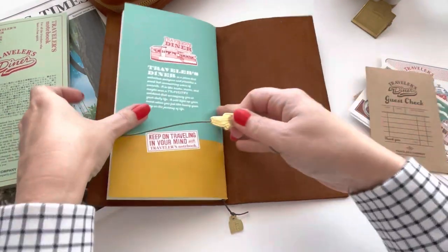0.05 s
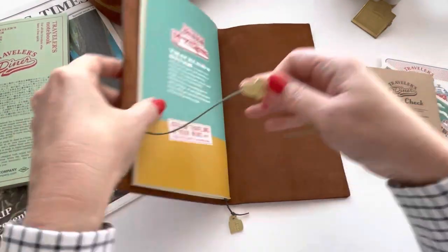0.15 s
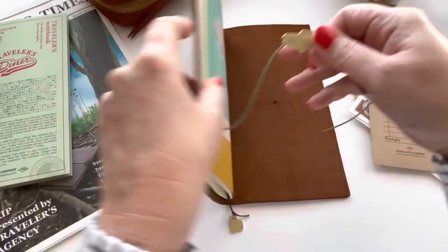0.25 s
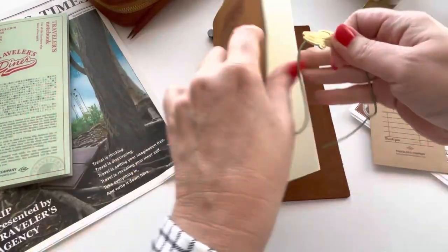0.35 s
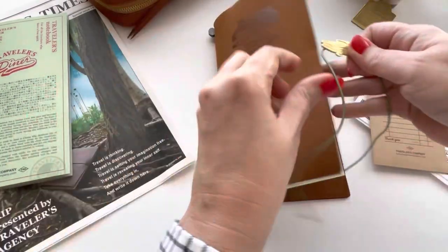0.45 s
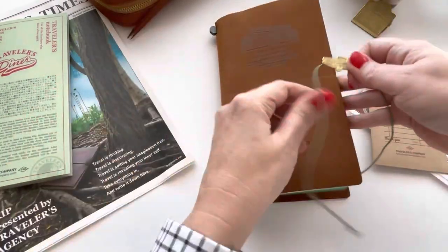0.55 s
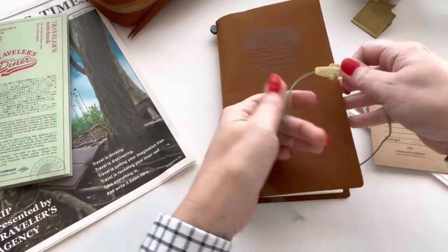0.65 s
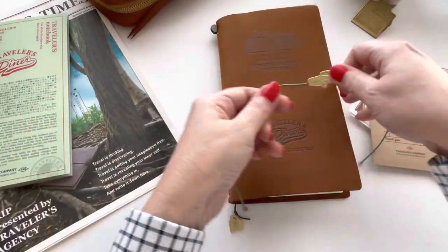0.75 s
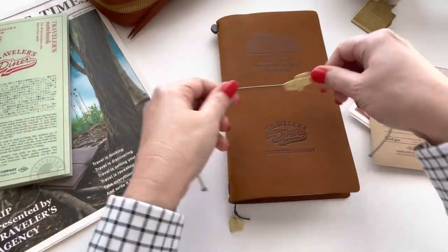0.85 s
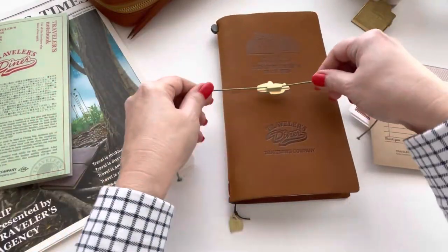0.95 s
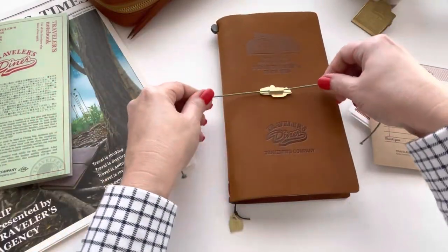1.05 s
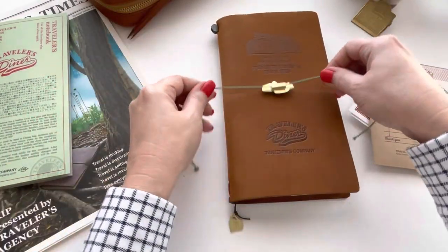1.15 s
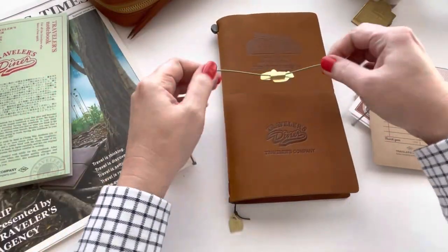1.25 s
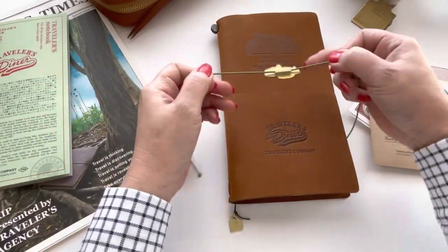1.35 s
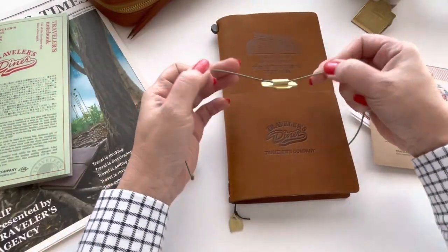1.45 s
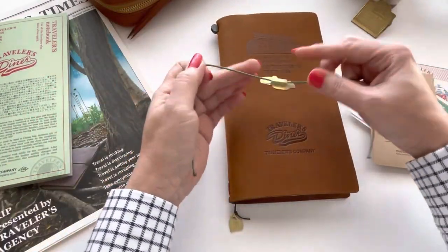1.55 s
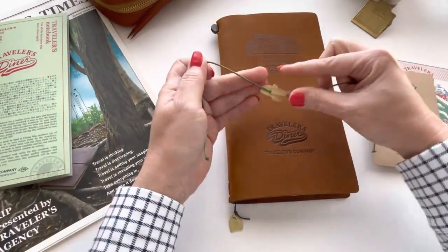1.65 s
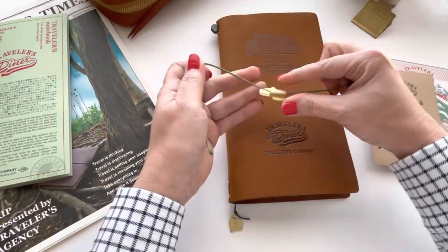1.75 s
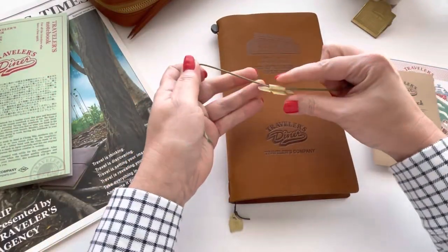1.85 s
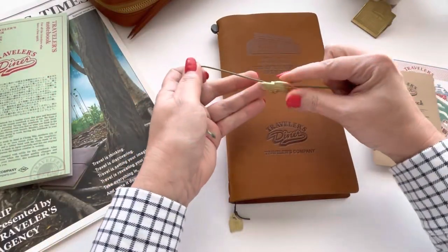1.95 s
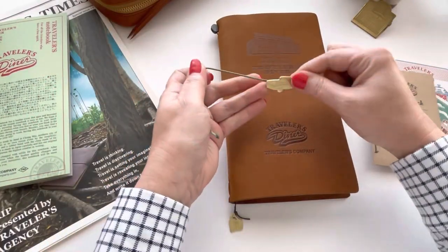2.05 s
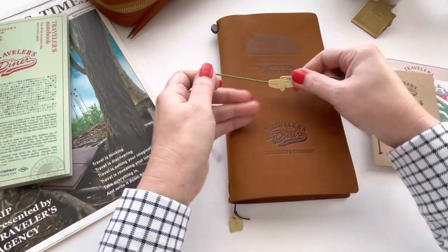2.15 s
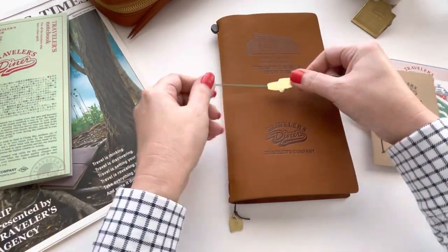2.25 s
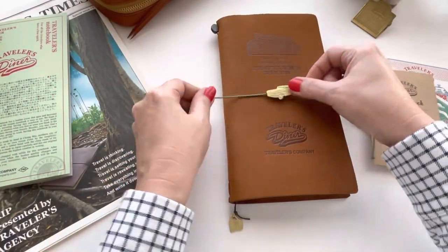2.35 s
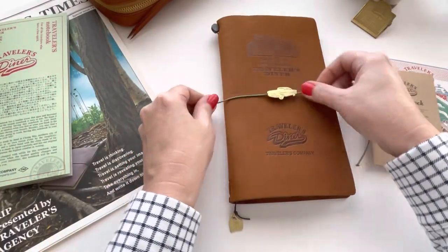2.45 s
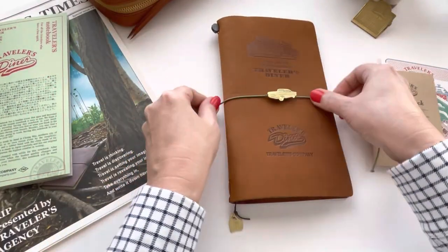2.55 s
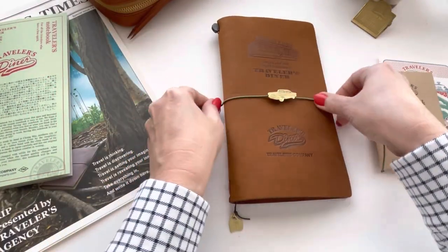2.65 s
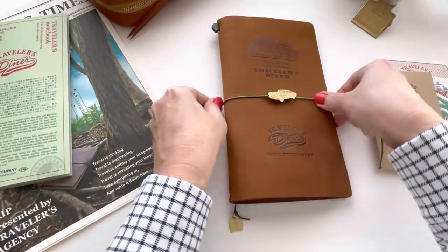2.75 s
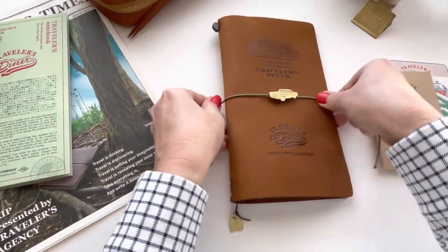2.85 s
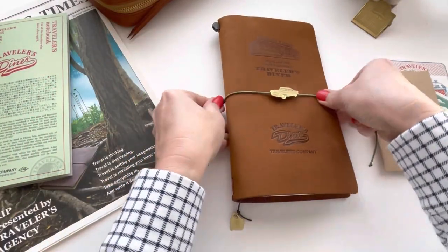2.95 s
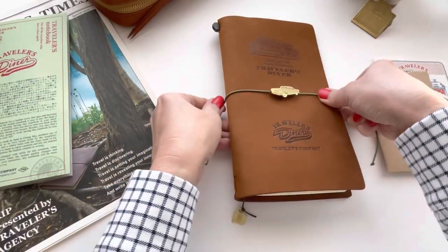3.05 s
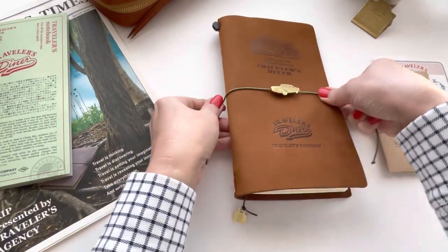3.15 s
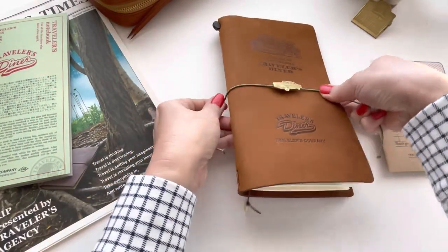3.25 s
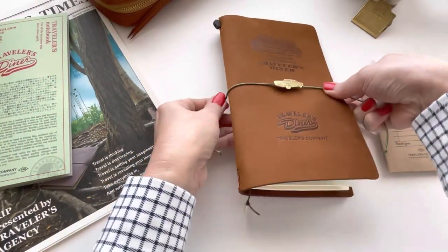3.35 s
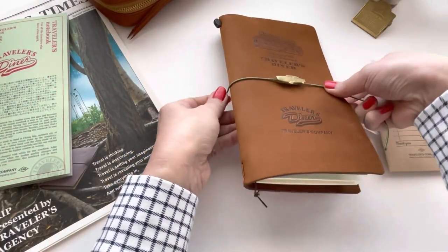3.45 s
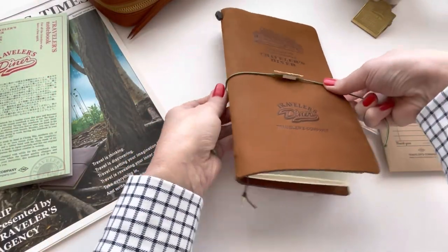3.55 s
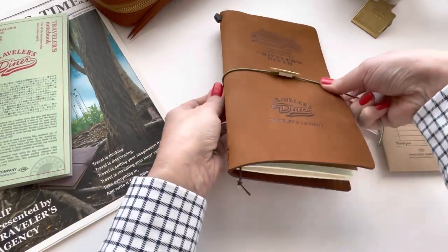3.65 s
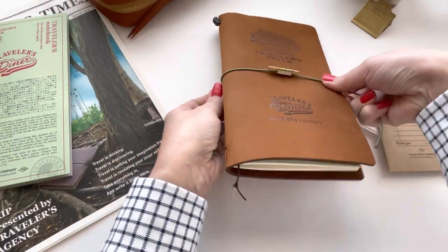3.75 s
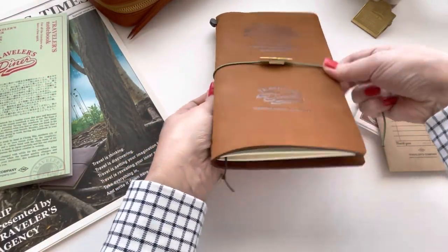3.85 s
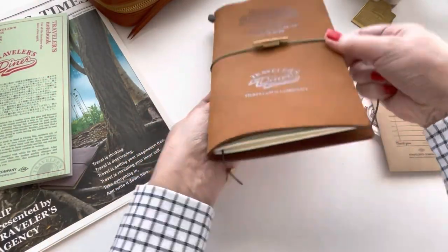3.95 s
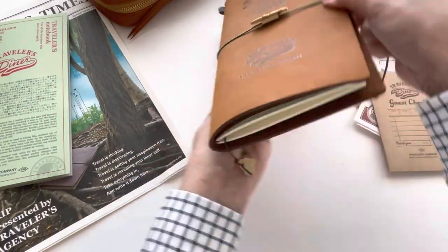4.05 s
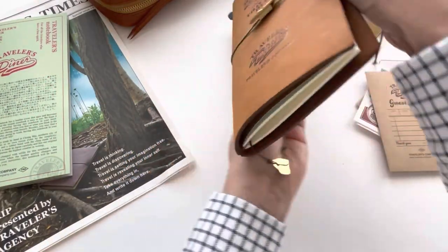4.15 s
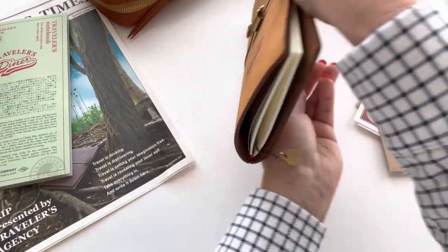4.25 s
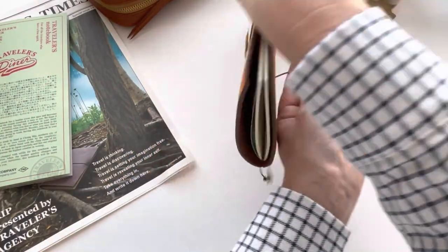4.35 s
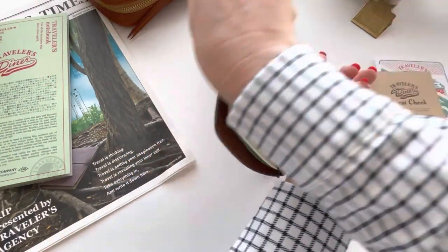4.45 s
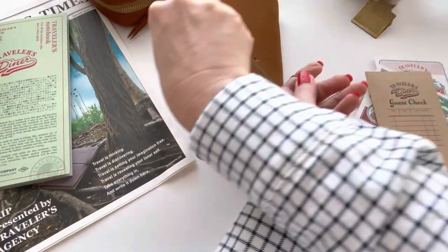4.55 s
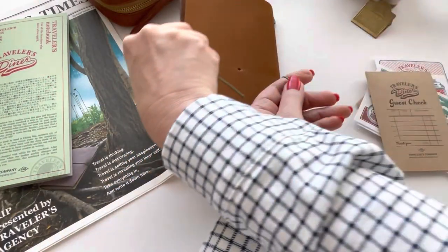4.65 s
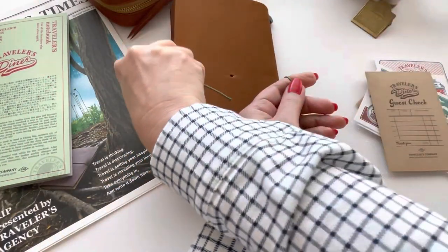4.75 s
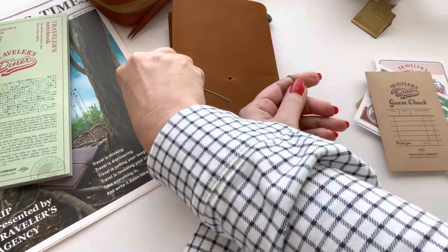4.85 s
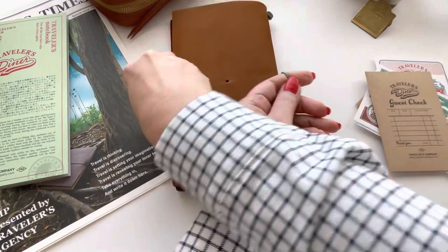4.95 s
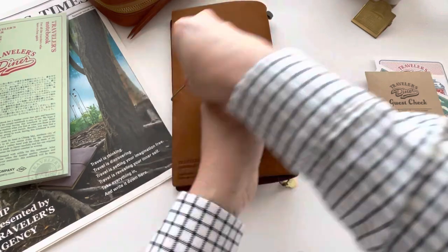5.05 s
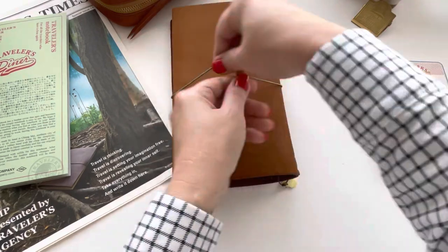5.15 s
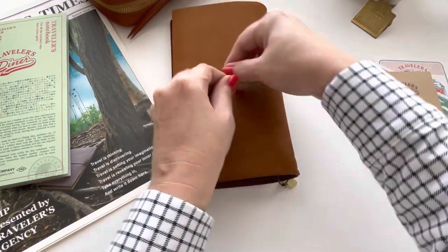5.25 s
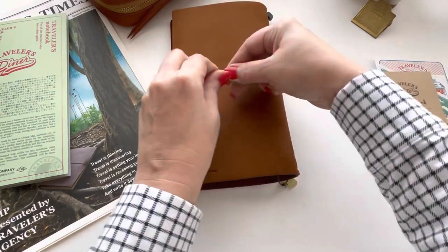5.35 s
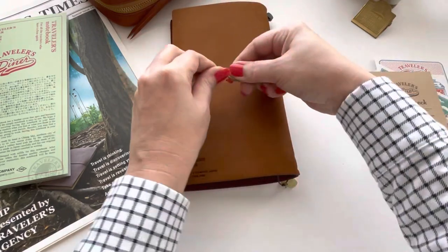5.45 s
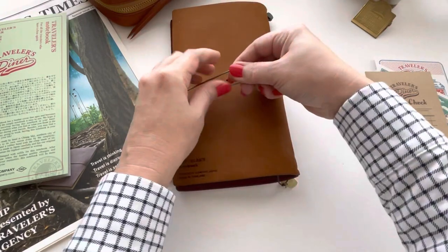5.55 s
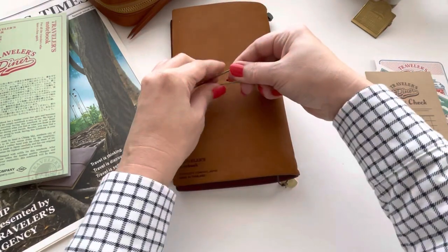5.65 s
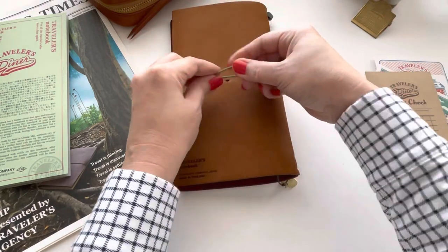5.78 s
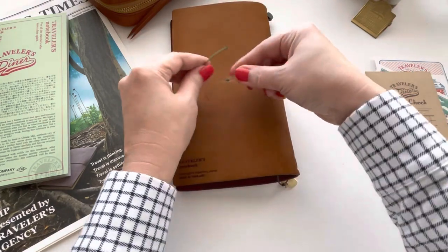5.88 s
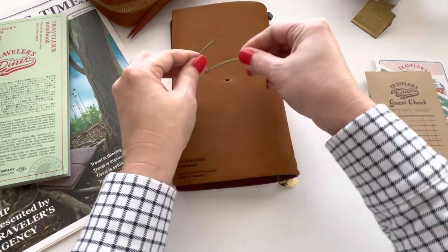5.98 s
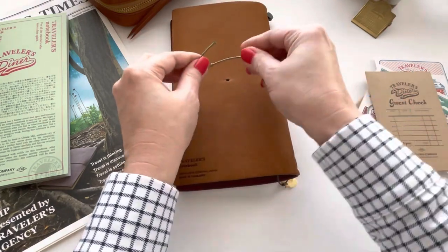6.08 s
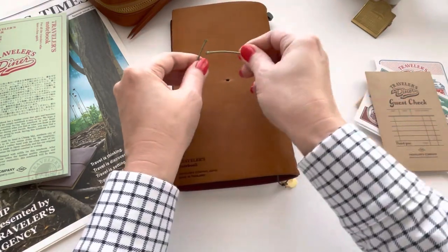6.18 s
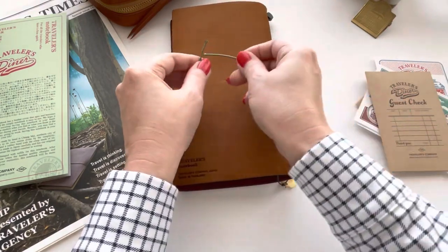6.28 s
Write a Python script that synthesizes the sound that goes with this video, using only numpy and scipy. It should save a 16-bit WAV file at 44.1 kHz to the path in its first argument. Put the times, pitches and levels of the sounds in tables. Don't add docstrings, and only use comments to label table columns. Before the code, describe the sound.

A close stereo microphone in a quiet room picks up hands closing a leather notebook, with scuffs, crisp ticks and a soft thud. Sparse taps and faint rubbing follow as a cord is adjusted. Later the book is turned over in a rapid cluster of loud knocks and clicks, then settles with a low thump. The end is almost silent, with only tiny skin and cord rubs, all slightly right of centre.

```python
import sys
import numpy as np
from scipy import signal
from scipy.fft import rfft, irfft, next_fast_len
from scipy.io import wavfile
from scipy.ndimage import uniform_filter1d, map_coordinates

SR = 44100
rng = np.random.default_rng(int(sys.argv[2]) if len(sys.argv) > 2 else 0)


def output_pcm(signal):
    pcm = np.clip(np.atleast_2d(signal).T, -1, 1) * 32767
    wavfile.write(sys.argv[1], SR, np.round(pcm).astype(np.int16))


def undo_db(level):
    steps = np.asarray(level, float) / 20
    return 10 ** steps


N = 278712

# start in seconds, peak in dB, centre in Hz, t60 in seconds.
CHARM_TICKS = [(.106, -49, 3100, 0.033), (.35, -37, 3020, 0.031), (.3615, -28.5, 1990, 0.017),
               (.621, -36, 847, 0.046), (2.263, -71, 1060, .034), (2.5755, -49, 4480, 0.026),
               (2.722, -57, 1130, 0.053), (3.396, -46.5, 1078, 0.056), (4.9135, -30.5, 6380, 0.07),
               (4.927, -30.5, 1470, 0.014), (5.299, -57, 1386, 0.14)]
NAIL_TAPS = [(.467, -49.5, 694, 0.099), (.4675, -40.5, 2380, 0.014), (.515, -51.5, 890, 0.075),
             (.9135, -45, 1790, 0.012), (.925, -31.5, 1280, 0.015), (1.3, -53, 1760, 0.023),
             (2.9185, -32.5, 1702, 0.041), (2.978, -40, 922, 0.074), (3.266, -49.5, 970, 0.013),
             (3.608, -45, 1368, 0.11), (4.4123, -21.5, 763, 0.059), (4.4125, -20.5, 1373, 0.022),
             (4.4885, -20, 4044, 0.022), (4.493, -26, 780, 0.023), (4.9135, -30, 1320, 0.032),
             (4.989, -42.5, 1424, 0.023), (5.268, -54, 731, 0.089), (5.81, -65, 1400, 0.094),
             (6.147, -62, 812, 0.059)]
EDGE_KNOCKS = [(.569, -38, 1790, 0.016), (1.0195, -42, 1930, 0.011), (1.021, -44.5, 810, 0.018),
               (1.026, -38, 1018, 0.015), (2.331, -38.5, 1160, 0.0075), (2.609, -44, 1442, 0.13),
               (2.657, -49.5, 1316, 0.072), (2.908, -39, 1403, 0.11), (2.927, -38, 720, 0.014),
               (3.527, -42.5, 1302, 0.042), (3.576, -48, 506, 0.017), (4.416, -24, 583, 0.051),
               (4.4598, -13.5, 968, 0.043), (4.467, -25, 910, 0.033), (4.487, -25.5, 1500, 0.02),
               (4.489, -14, 1677, 0.018), (4.503, -25, 958, 0.038), (4.627, -35.5, 1208, 0.036),
               (4.941, -36, 1060, 0.027)]

# start in seconds, peak in dB, centre in Hz,
# contact time in seconds.
CREAKS = [(0, -30, 3820, 0.033), (.356, -31, 740, 0.016), (.572, -30.5, 2370, 0.028),
          (2.75, -46, 2200, 0.12), (3.05, -53, 1510, 0.02), (3.06, -52.5, 840, 0.041),
          (3.205, -43, 950, 0.051), (3.21, -51, 2060, 0.027), (3.305, -53, 1530, 0.01),
          (3.79, -47, 2090, 0.025), (3.862, -54, 1950, 0.033), (4.54, -25, 1110, 0.02),
          (5.11, -48, 1480, 0.053)]
SHUFFLES = [(.001, -49.5, 574, 0.033), (.598, -33.5, 872, 0.0075), (3.155, -50.5, 1320, 0.066),
            (3.74, -50, 1445, 0.066), (4.432, -32.5, 1590, 0.03), (4.505, -35, 1370, 0.018),
            (4.57, -39.5, 685, 0.11), (4.635, -41.5, 1370, 0.054), (4.668, -46.5, 1210, 0.028),
            (4.705, -42, 1120, 0.031), (4.775, -47, 1535, 0.049), (4.87, -49, 1520, 0.074),
            (5.275, -52, 1400, 0.055)]
SQUEAKS = [
    (4.33, -54.5, 1480, 0.054),
    (4.345, -44.5, 2430, .025),
    (4.365, -39.5, 2294, 0.019),
]

# start in seconds, peak in dB, start pitch in Hz, t60 in seconds.
SNAPS = [(.3495, -35, 5100, 0.0068), (0.3612, -28.5, 11000, 0.0046), (0.3613, -31, 2500, 0.0092),
         (0.365, -30, 1950, 0.014), (0.467, -54, 3640, 0.0027), (0.5685, -34, 6450, 0.0046),
         (0.59, -39, 7100, 0.0045), (0.6221, -28, 1540, 0.0092), (0.6222, -37, 4450, 0.0036),
         (.7775, -57, 12100, .003), (.7895, -48, 12600, 0.0036), (.7952, -51, 11900, .003),
         (.7992, -61, 12500, 0.0033), (.8052, -53, 11900, 0.0033), (0.9136, -23.5, 1270, 0.0068),
         (0.9141, -27, 2300, 0.0087), (0.9251, -29.5, 1470, 0.0064), (0.9194, -37, 330, 0.027),
         (.925, -27, 2360, 0.0041), (1.0201, -27.5, 1780, 0.005), (1.0262, -38, 1110, 0.013),
         (2.6102, -44, 1830, 0.017), (2.918, -28.5, 3220, 0.0021), (2.9187, -38, 1780, 0.012),
         (2.921, -36, 600, 0.01), (2.928, -37, 1620, .009), (2.9813, -39, 473, 0.0095),
         (2.977, -29.5, 1530, 0.0046), (3.2673, -46.5, 2470, 0.006), (3.527, -43, 2550, 0.0056),
         (3.527, -39, 1580, 0.0082), (3.576, -23.5, 477, 0.016), (3.6075, -42.5, 1890, 0.017),
         (4.4134, -19, 1880, 0.01), (4.415, -24.5, 471, 0.036), (4.4602, -13, 1200, 0.01),
              (4.4602, -28, 4760, 0.003), (4.4861, -20.5, 1150, 0.007), (4.489, -19.5, 3420, 0.0045),
              (4.4884, -12, 2000, .007), (4.4909, -25, 4900, 0.0096), (4.4949, -21, 1000, 0.011),
              (4.4972, -18, 1500, 0.007), (4.503, -17.5, 1697, 0.0067), (4.545, -26.5, 1850, 0.011),
              (4.628, -26.5, 1700, 0.0084), (4.914, -31.5, 3350, .005), (4.927, -37, 3800, 0.008),
              (4.937, -36, 2060, .008), (4.9426, -21.5, 1200, 0.0051), (4.945, -31.5, 420, 0.021),
              (4.958, -52, 1900, 0.0068), (4.988, -46, 2800, .006), (5.088, -50, 1180, 0.014),
              (5.267, -43, 1295, 0.0069), (5.299, -53, 3000, 0.0045), (5.887, -55, 2510, .01),
         (.3665, -48, 8000, .004), (0.367, -29.5, 1110, .012), (0.3708, -29, 3220, 0.004),
            (0.383, -47, 3020, .006), (.401, -49, 1200, 0.0087), (0.626, -34, 3760, 0.0032),
            (.6295, -46, 1200, 0.0097), (0.915, -34, 4460, 0.0021), (0.925, -39.5, 4800, 0.0032),
            (.9455, -52, 1490, 0.0087), (1.0214, -48, 3970, 0.0038), (2.9237, -42, 1810, .008),
            (2.9295, -37, 990, 0.0088), (3.215, -52, 1800, .006), (3.235, -57, 2600, .006),
            (4.4161, -21, 1710, 0.011), (4.418, -18.5, 911, 0.0086), (4.421, -21, 803, 0.016),
            (4.4245, -23.5, 900, 0.018), (4.4415, -27.5, 1793, 0.012), (4.448, -34, 2493, 0.0045),
            (4.4852, -36.5, 7000, 0.0048), (4.496, -28.5, 3800, 0.0041), (4.502, -29.5, 3196, 0.0058),
            (4.511, -42.5, 4500, 0.0047), (4.514, -39.5, 3490, .005), (4.522, -50, 4200, 0.0039),
            (4.546, -39, 5000, .004), (4.551, -20, 1500, 0.004), (4.556, -52, 4000, 0.0047),
            (4.567, -39, 3300, .005), (4.72, -49, 1400, .01), (4.9485, -38, 810, 0.021)]

# start in seconds, peak in dB, hardness in dB per octave,
# deepest mode in dB, landing time in seconds.
LANDINGS = [(0.356, -32.5, 1, -11, 0.018), (.601, -17.5, -1, -21.5, 0.0037),
            (.613, -53.5, 26.5, -15, 0.0032), (.635, -31.5, -11, -7.5, 0.0028),
            (.916, -32.5, 0.5, -16.5, 0.0043), (1.029, -45, 8.5, -15, 0.0012),
            (2.332, -46.5, 12.5, -11.5, 0.0089), (2.61, -32.5, 1, -19.5, 0.0084),
            (2.719, -37, -5, -29, 0.004), (2.819, -42, 5.5, -14.5, 0.003), (2.93, -34.5, 1, -29, 0.0041),
            (2.9802, -27, -2.5, -22, 0.0028), (3.402, -47.5, 8, -15, 0.0015),
            (3.579, -27.5, 4, -15.5, 0.0023), (3.61, -37, 9, -37, 0.0012), (4.413, -30, 23.5, -25.5, 0.012),
            (4.462, -28.5, 15.5, -36, 0.0017), (4.49, -33.5, 22, -28.5, 0.0033),
            (4.542, -24, 14, -25, 0.0089), (4.952, -21.5, -36, -20, 0.0046)]
# frequency in Hz, level in dB, free t60 in seconds.
TABLE_MODES = [(187.4, 2.5, 0.13), (241.8, -2, 0.12), (350, -2, 0.064), (403.6, -10, 0.11),
               (563, -30, 0.076)]

# peak in seconds, fall in seconds, level in dB,
# smoothness in dB of hiss over the leather grain.
BRUSHES = [(0, 0.042, -42, 3), (.363, 0.047, -47, -3), (.568, 0.021, -43.5, 5), (.591, 0.023, -49.5, 9),
           (.928, 0.023, -48, -34), (1.64, 0.11, -72, -19), (2.264, 0.0017, -49.5, 8),
           (2.592, 0.038, -54, 4), (4.463, 0.0084, -37, -29.5), (4.508, 0.068, -43.5, -36),
           (4.65, 0.013, -59, -25), (4.923, 0.032, -46, -3)]
SLIDES = [(.06, 0.082, -52, 27), (.322, 0.011, -43.5, 9), (.31, 0.021, -55, 15), (.484, 0.022, -54.5, -6.5),
          (.795, 0.022, -67, 26), (1.094, 0.004, -61.5, 35), (1.178, 0.02, -53, 23), (1.5, .016, -69, 19),
          (2.79, 0.027, -54, -7), (3.227, 0.041, -65, 13), (3.393, 0.01, -46.5, 17),
          (3.56, 0.044, -62, -30), (3.76, 0.036, -66, -6), (3.804, 0.016, -62.5, -4),
          (3.998, 0.041, -64, 0.5), (4.15, 0.012, -62, 10), (4.379, 0.051, -49.5, -0.5),
          (5.76, 0.0082, -71.5, 8.5)]
PULLS = [
    (3.04, 0.022, -62, -3),
    (4.25, 0.042, -62, 5),
    (4.798, 0.016, -71, -21),
    (5.13, 0.021, -60, 1.5),
]
# peak in seconds, fall in seconds, level in dB.
CORD = [(.06, 0.08, -56), (.323, .013, -49), (.363, 0.028, -51), (.795, 0.015, -67), (1.095, .0032, -54),
        (1.5, 0.017, -63), (1.64, .022, -73), (2.795, 0.027, -74), (3.045, .03, -57.5),
        (3.226, .015, -50.5), (4.15, .021, -66.5), (4.379, .047, -52), (4.461, 0.0019, -28),
        (4.515, .045, -61), (5.12, 0.046, -56), (5.76, 0.017, -58.5)]
# time in seconds, rustle in dB.
SLEEVES = [(0, -64), (.37, -68), (.49, -68), (0.627, -48), (.7, -72), (1.2, -75.5), (1.51, -70.5),
           (1.72, -79.5), (2.6, -72.5), (2.8, -58.5), (2.95, -67.5), (3.66, -76), (4.37, -67), (4.54, -65),
           (4.91, -72.5), (5.12, -65.5), (5.599, -76), (6.099, -71)]
# frequency in Hz, density in dB per Hz.
LEATHER = [(290, -75), (500, -24), (1170, -17), (1370, -11), (1880, -10.5), (2290, -11), (4450, -20),
           (7000, -32.5), (9100, -35.5), (15400, -120)]
HISS = [(1760, -52.5), (3000, -13), (3520, -10.5), (4810, -4), (7910, -5.5), (9000, -6), (13000, -9.5)]
AIR = [(7350, -46), (12500, -10), (13600, -9), (14800, -10), (15800, 0), (16200, -30)]
# frequency in Hz, left-right likeness from -1 to 1.
SCUFF_ALIKE = [(500, 0.17), (2000, 0.063), (8000, 0.063), (14000, 0.28)]

# peak in seconds, fall in seconds, level in dB,
# frequency in Hz, width in Hz.
WHINES = [(0, 0.042, -43, 3570, 885), (0, 0.023, -40.5, 4600, 1090), (0, 0.031, -50.5, 1450, 500),
          (.115, .014, -59.5, 3320, 2000), (.1, 0.27, -63.5, 307, 394), (.322, 0.0094, -52, 2980, 900),
          (0.382, 0.033, -52, 3530, 1200), (0.573, 0.012, -42, 2030, 500), (0.59, 0.0049, -37, 2280, 500),
          (.945, 0.017, -58, 2400, 500), (1.045, 0.013, -63, 2370, 500), (1.46, 0.039, -73, 2090, 500),
          (2.78, 0.052, -59, 2060, 600), (3.043, 0.0093, -52.5, 913, 220), (3.055, .015, -59, 1280, 1490),
          (3.592, 0.021, -52, 560, 493), (3.0, 0.032, -61, 950, 500), (3.227, 0.018, -52.5, 920, 249),
          (3.23, 0.011, -54, 1860, 895), (3.315, 0.0074, -55, 1510, 600), (3.6, 0.035, -72.5, 7000, 700),
          (3.62, 0.016, -57, 1460, 880), (3.745, 0.016, -64.5, 2200, 400), (3.755, 0.013, -62, 1370, 300),
          (3.8, 0.015, -60, 2410, 400), (3.806, .012, -57.5, 1330, 300), (3.86, 0.1, -73.5, 6770, 800),
          (4.342, 0.011, -49.5, 2320, 400), (4.37, 0.021, -54, 1450, 346), (4.383, 0.017, -41.5, 2270, 300),
          (4.645, 0.042, -50, 1570, 492), (4.678, 0.0087, -46.5, 850, 300), (4.66, 0.046, -54, 325, 256),
          (4.74, 0.046, -60, 214, 121), (4.935, 0.0088, -48.5, 430, 300), (4.97, 0.018, -60, 1390, 400),
          (5.06, 0.034, -65, 1400, 300), (5.13, 0.016, -61, 1475, 499), (5.819, 0.014, -69.5, 2630, 1490),
          (5.815, 0.019, -69, 1340, 400), (6.0, 0.038, -68.5, 1890, 900), (6.15, 0.0071, -66, 1504, 696),
          (6.27, 0.024, -68, 1940, 920)]

# time in seconds, left over right in dB.
HANDS = [
    (0, -9),
    (2.5, -13.5),
    (3.8, -7),
    (4.4, -4),
    (4.999, -5.5),
    (5.4, -8.5),
]
# frequency in Hz, t60 in seconds.
ROOM = [(150, 0.28), (1000, 0.16), (4000, 0.17), (12000, 0.053)]
# frequency in Hz, density in dB per Hz.
HUSH = [(24, -59), (40, -19), (70, -9), (118, -1), (181, -5), (244, -5), (469, -11), (603, -14.5),
        (948, -18.5), (1020, -19.5), (1380, -30.5), (10800, -33.5), (16200, -34)]
# frequency in Hz, left-right likeness from -1 to 1.
HUSH_ALIKE = [(60, 0.42), (130, 0.76), (290, 0.41), (640, 0.44), (1410, -0.76), (3100, -0.96),
              (6820, -0.015), (15000, -0.1)]

# frequency in Hz, gain
# in dB.
HANDLING_TONE = [(20, -32), (45, -7), (80, 3.5), (11000, -3.5), (12600, -10), (13800, -2)]
# frequency in Hz, gain in dB.
TOP = [(12300, 0), (12750, -10), (13200, 0), (15700, 0), (15950, -50)]
# frequency in Hz, gain in dB.
NARROWING = [(13900, 0), (15100, -26)]


def unit(x):
    return x / np.sqrt(np.mean(x ** 2) + 1e-20)


def along(points, hz):
    f, v = np.transpose(points)
    return np.interp(np.log(hz + 1), np.log(f + 1), v)


def wobble(rate):
    knots = rng.standard_normal(int(N * rate / SR) + 4)
    return map_coordinates(knots, [np.arange(N) * rate / SR])


def filtered(x, response):
    m = next_fast_len(N + SR // 2)
    return irfft(rfft(x, m) * response(np.fft.rfftfreq(m, 1 / SR)), m)[..., :N]


def add(out, s, sound):
    start = round(s * SR)
    out[start:start + len(sound)] += sound


def cover(t, centre_hz, t60, octaves):
    spread = np.linspace(-1, 1, num=12)[:, None]
    scatter = rng.standard_normal((2, 12, 1))
    hz = centre_hz * 2 ** (octaves * (spread + 0.054 * scatter[0]))
    sign = (-1) ** np.arange(12)[:, None]
    size = sign * undo_db(-9 * spread ** 2 + 3.5 * scatter[1])
    decay = undo_db(-60 * t / (t60 * (1000 / hz) ** 0.5))
    return np.sum(size * decay * np.sin(2 * np.pi * hz * t), axis=0)


def blows():
    out, t = np.zeros(N + SR), np.arange(SR // 10) / SR
    # its blows, crack in dB re peak, contact time in seconds
    strikers = [(CHARM_TICKS, -4, 0.0001), (NAIL_TAPS, -18, 0.00078), (EDGE_KNOCKS, -45, 0.00011)]
    for events, crack_db, contact in strikers:
        for s, db, centre_hz, t60 in events:
            ring = cover(t, centre_hz, t60, octaves=1.077) * (1 - np.exp(-t / contact))
            crack = np.diff(rng.standard_normal(len(t) + 2))
            crack = crack[:-1] + 0.92 * crack[1:]
            crack = crack * undo_db(-60 * t / 0.014)
            add(out, s, undo_db(db) * (ring / abs(ring).max() + undo_db(crack_db - 2.5) * crack))
    return out[:N]


def rattles():
    out, t = np.zeros(N + SR), np.arange(SR // 6) / SR
    # t60 in seconds, spread in octaves
    contacts = [(CREAKS, 0.011, 0.48), (SHUFFLES, 0.018, 1.066), (SQUEAKS, 0.044, 0.27)]
    for touches, t60, octaves in contacts:
        for s, db, centre_hz, contact in touches:
            stroke = np.sin(np.pi * np.sqrt(np.clip(t / contact, 0, 1)))
            unevenness = undo_db(15.0 * rng.standard_normal(len(t)))
            slips = stroke * rng.standard_normal(len(t)) * unevenness
            ring = signal.fftconvolve(cover(t, centre_hz, t60, octaves), slips)[:len(t)]
            add(out, s, undo_db(db) * ring / abs(ring).max())
    return out[:N]


def snaps():
    out, t = np.zeros(N + SR), np.arange(SR // 20) / SR
    sag_octaves = 0.85
    for s, db, start_hz, t60 in SNAPS:
        hz = start_hz * 2 ** (-sag_octaves * t / t60)
        cycles = np.sin(2 * np.pi * np.cumsum(hz) / SR)
        onset = 1 - np.exp(-t * start_hz / 0.43)
        add(out, s, undo_db(db + 4.0 - 60 * t / t60) * cycles * onset)
    return filtered(out[:N], lambda hz: (1j * hz / (1j * hz + 120)) ** 2)


def thuds():
    out, t = np.zeros(N + SR), np.arange(SR // 3) / SR
    damping = 0.77
    for s, db, hard_db, deep_db, landing in LANDINGS:
        spot = rng.standard_normal((len(TABLE_MODES), 2)) * [1.5, 0.015]
        ring = undo_db(deep_db + 5.0 - 60 * t / 0.22) * np.sin(2 * np.pi * 91 * t)
        for (hz, level, t60), (shift_db, detune) in zip(TABLE_MODES, spot):
            mode_db = level + hard_db * np.log2(hz / 180) + shift_db
            decay = undo_db(mode_db - 60 * t / (t60 * damping))
            ring = ring + decay * np.sin(2 * np.pi * hz * (1 + detune) * t)
        add(out, s, undo_db(db - 7.5) * ring * (1 - np.exp(-t / landing)))
    return out[:N]


def swell(peak, rise, fall):
    u = np.arange(N) / SR - peak
    return np.exp(-2 * np.clip(u / np.where(u < 0, rise, fall), -5, 5) ** 2)


def rush(spectrum, alike, grit_db, patchy_db):
    slips = rng.standard_normal((2, N)) * undo_db(grit_db * wobble(900))
    z = signal.stft(slips, nperseg=512)[2]
    field = rng.standard_normal(z.shape[1:])
    for axis in (0, 1):
        field = uniform_filter1d(field, size=5, axis=axis)
    pair = signal.istft(z * undo_db(patchy_db * unit(field)), nperseg=512)[1][:, :N]

    def mid_side(hz):
        turn = np.arccos(np.clip(along(alike, hz), -1, 1)) / 2
        return undo_db(along(spectrum, hz)) * [np.cos(turn), np.sin(turn)]

    mid, side = filtered(pair, mid_side)
    return unit(np.array([mid + side, mid - side]))


def scuffs():
    rustle = undo_db(2 * np.interp(np.arange(N) / SR, *np.transpose(SLEEVES)))
    power = np.array([rustle, undo_db(2 * -13.5) * rustle, 0 * rustle])
    sheen_db = -25.5
    for strokes, rise in [(BRUSHES, 0.34), (SLIDES, 0.81), (PULLS, 4.1)]:
        for peak, fall, db, smooth_db in strokes:
            leather_db = db - max(smooth_db, 0)
            hiss_db = db + min(smooth_db, 0)
            levels = np.array([[leather_db], [hiss_db], [hiss_db + sheen_db]])
            power += undo_db(2 * levels) * swell(peak, rise * fall, fall)
    for peak, fall, db in CORD:
        power[2] += undo_db(2 * db) * swell(peak, 0.53 * fall, fall)
    grain = np.array([rush(LEATHER, SCUFF_ALIKE, grit_db=0.0, patchy_db=3.0),
                      rush(HISS, SCUFF_ALIKE, grit_db=1.5, patchy_db=2.8),
                      rush(AIR, SCUFF_ALIKE, grit_db=2.5, patchy_db=-3.5)])
    return np.sum(np.sqrt(power)[:, None] * grain, axis=0) * undo_db([[-2.2], [2.2]])


def whines():
    shared, own = rng.standard_normal(N), rng.standard_normal((2, N))
    alike = 0.36
    slips = np.sqrt(alike) * shared + np.sqrt(1 - alike) * own
    slips = slips * undo_db(2.27 * wobble(400))
    out = np.zeros((2, N))
    for peak, fall, db, hz, width_hz in WHINES:
        edges = [hz - width_hz / 2, hz + width_hz / 2]
        band = signal.butter(2, edges, "bandpass", fs=SR, output="sos")
        span = slice(max(round((peak - 0.3) * SR), 0), round((peak + 0.3) * SR))
        stroke = np.sqrt(swell(peak, fall, fall)[span])
        out[:, span] += undo_db(db) * stroke * unit(signal.sosfilt(band, slips[:, span]))
    return out * undo_db([[-1.8], [1.8]])


def at_capsules(hits):
    side_db = np.interp(np.arange(N) / SR, *np.transpose(HANDS)) * [[0.5], [-0.5]]

    def lag(hz):
        return np.exp(np.pi * np.minimum(hz, 2300) * 1.1e-4 * [[-1j], [1j]])

    def bounce(hz):
        return 1 + undo_db(-14.5) * np.exp(-2j * np.pi * hz * [[0.0006], [0.00035]])

    return filtered(filtered(hits * undo_db(side_db), lag), bounce) * undo_db(-0.07)


def room(x):
    out, hop = np.zeros((2, N + SR)), SR // 3
    for start in range(0, N, hop):
        hz, t, z = signal.stft(rng.standard_normal((2, SR // 3)), SR, nperseg=128)
        z[1] = np.where(hz[:, None] < 600, z[0], z[1])
        decay = undo_db(-60 * t / along(ROOM, hz)[:, None])
        tail = signal.istft(z * decay, SR, nperseg=128)[1]
        tail = tail / np.linalg.norm(tail[0])
        wet = signal.fftconvolve(x[None, start:start + hop], tail, axes=1)
        out[:, start + 90:start + 90 + wet.shape[1]] += wet
    return out[:, :N]


def room_tone():
    level = undo_db(-62.5 + 1.1 * wobble(17.0))
    return level * rush(HUSH, HUSH_ALIKE, grit_db=-1.0, patchy_db=-1.0) * undo_db([[-1.2], [1.2]])


def scene():
    rings, clicks = blows() + rattles(), snaps()
    low, rub = thuds(), scuffs()
    near = at_capsules(rings + clicks)
    low_pair = filtered(low * undo_db([[-1.6], [1.6]]), lambda hz: np.exp(hz * 0.00066 * [[-1j], [1j]]))
    sent = undo_db(-7.0) * rings + undo_db(-11.0) * clicks + undo_db(-13.5) * low + undo_db(-14.0) * rub.mean(axis=0)
    handling = near + low_pair + rub + room(sent) + whines()
    return filtered(handling, lambda hz: undo_db(along(HANDLING_TONE, hz))) + room_tone()


def top_cut(x):
    return signal.sosfilt(signal.butter(12, 16690, fs=SR, output="sos"), x)


def record(dry):
    pair = np.array([dry[0] + dry[1], dry[0] - dry[1]]) / 2
    mid, side = filtered(pair, lambda hz: undo_db(along(TOP, hz) + [0 * hz, along(NARROWING, hz)]))
    return top_cut(np.array([mid + side, mid - side]))


dry = scene()
out = record(dry)
output_pcm(out)
```